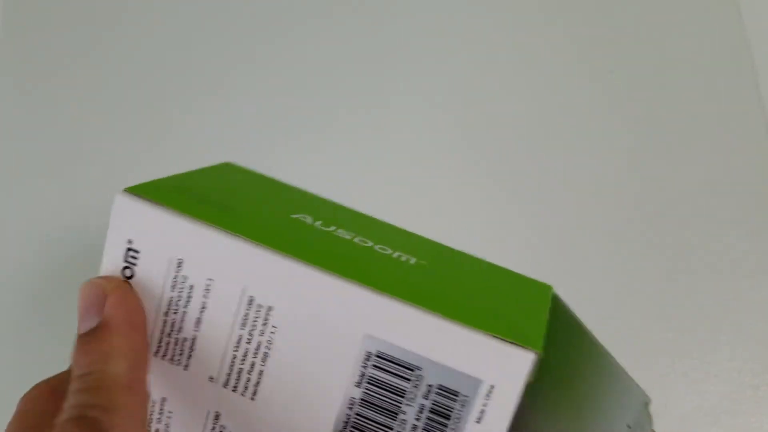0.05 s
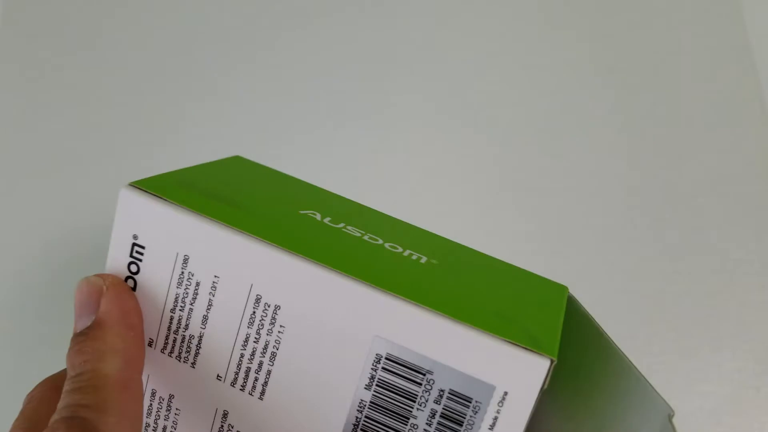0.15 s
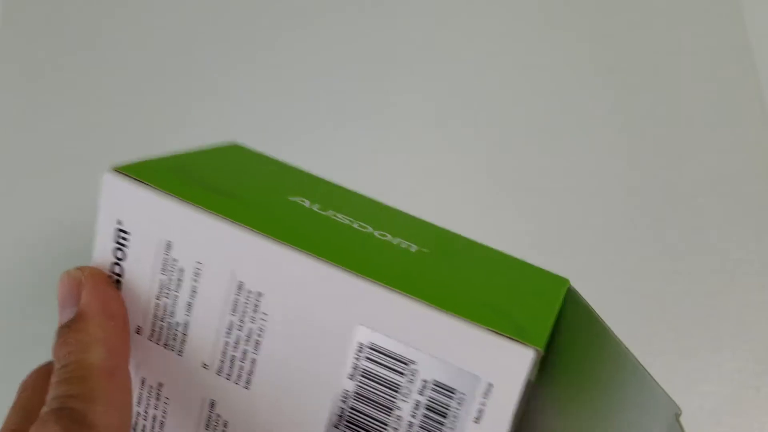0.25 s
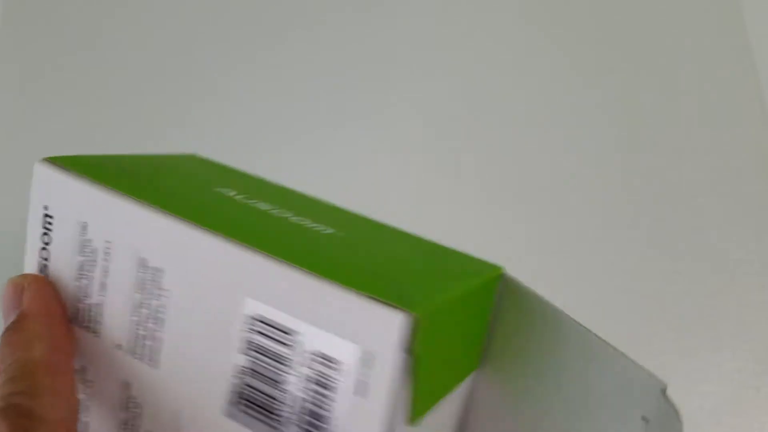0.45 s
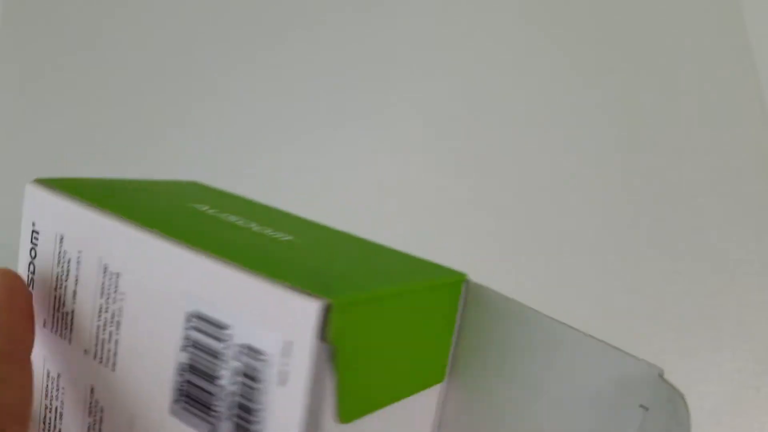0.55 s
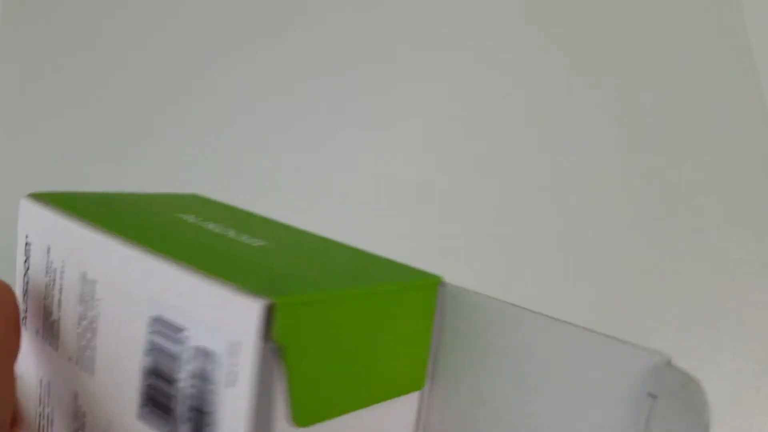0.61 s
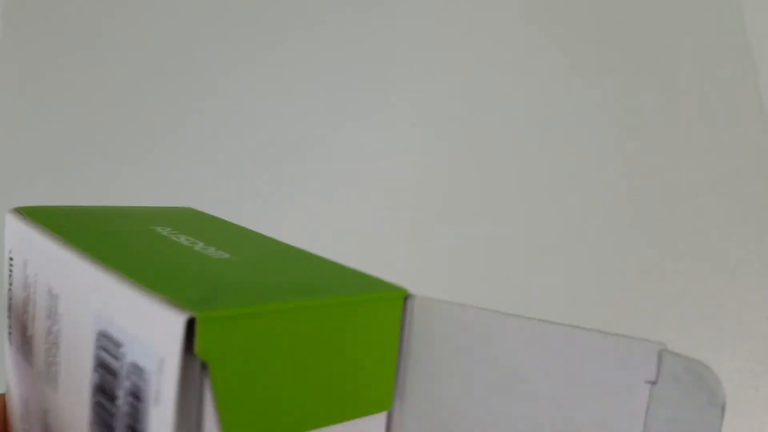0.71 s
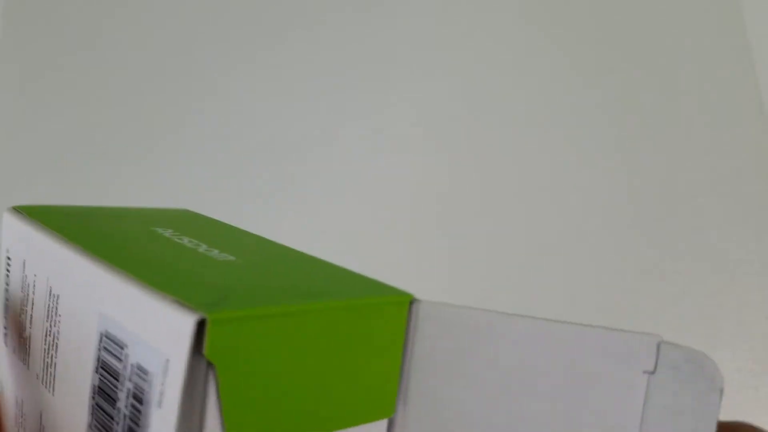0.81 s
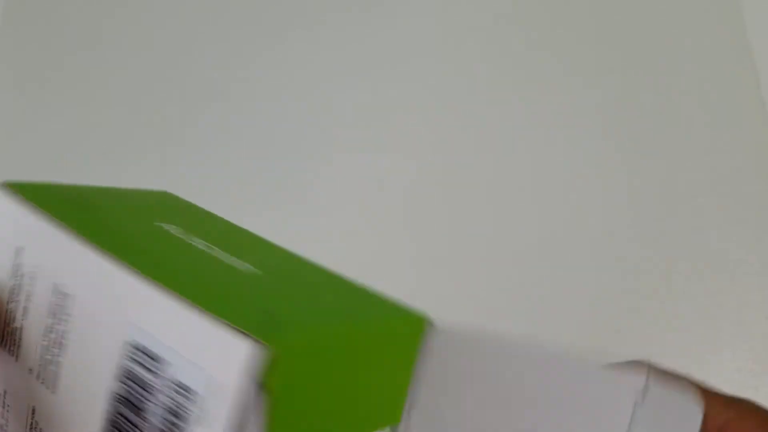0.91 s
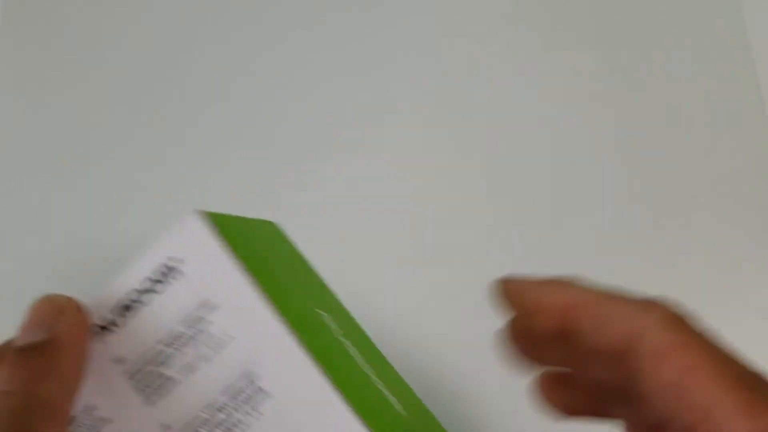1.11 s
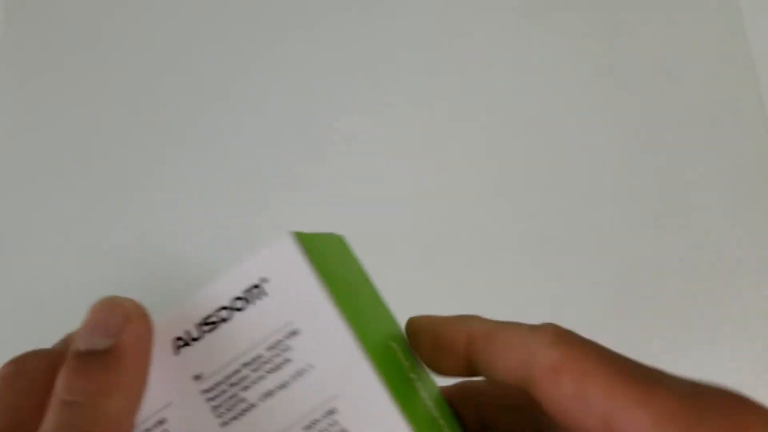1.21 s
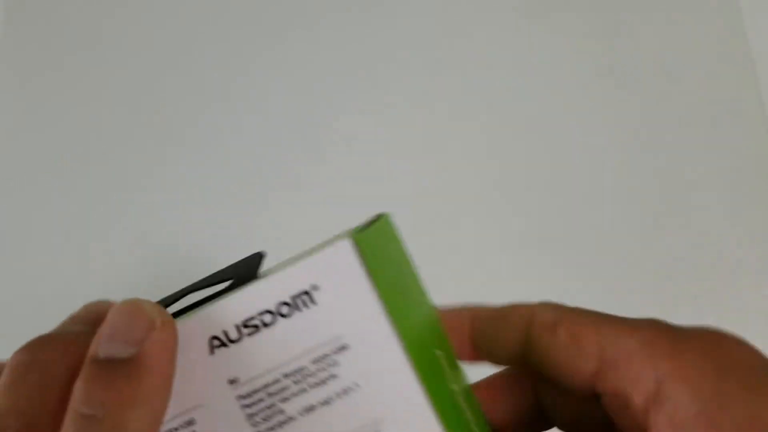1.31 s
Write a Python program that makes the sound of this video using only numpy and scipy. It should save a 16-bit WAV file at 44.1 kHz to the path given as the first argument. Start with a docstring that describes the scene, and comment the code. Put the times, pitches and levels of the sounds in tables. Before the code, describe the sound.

One loud snap of a cardboard lid coming free follows light knocks and a brief drag. Then hands turn the box, quietly rubbing and tapping it, close to the microphone and slightly right, over a faint low room hum.

```python
"""A brief scrape and a few hollow knocks: hands on a small cardboard box, close to the microphones and
a little to the right, in a bare room. The lid's tongue drags in its slot and pops free with one loud
snap that rings the lid and fills the room. As the box is turned over the flaps rub, fingers slide
over the print and tap the walls. A faint low hum throbs underneath, over quiet air."""
import sys
import numpy as np
from scipy import signal
from scipy.fft import rfft, irfft
from scipy.io import wavfile

SR = 44100
rng = np.random.default_rng(int(sys.argv[2]) if len(sys.argv) > 2 else 0)


def file_out(sig):
    """Save sig as 16-bit WAV at sys.argv[1]."""
    # one column per channel
    cols = np.atleast_2d(sig).T
    # limit, then scale
    lim = np.clip(cols, -1, 1)
    pcm = np.round(lim * 32767).astype(np.int16)
    wavfile.write(sys.argv[1], SR, pcm)


N = 59535
T = np.arange(N) / SR

# spectrum of the quiet air in the room: frequency_hz, level_db
AIR_SPECTRUM = [(20, -4), (60, -3), (110, -3), (160, -21), (1000, -30.5), (4000, -40.5), (16000, -37)]
# how long the bare room rings: frequency_hz, t60_s
ROOM_DECAY = [(100, .3), (400, .26), (1000, .265), (5000, .275), (9000, .22), (15000, .21)]
# card drags on card: start_s, end_s, level_db, tilt_db_per_octave
CARD_DRAGS = [(-0.02, 0.003, -47, -0.8), (0.145, 0.255, -52, -0.7), (0.382, 0.467, -68, 0),
              (0.488, 0.534, -61, 1.5), (0.52, 0.64, -74.5, 1.5), (0.634, 0.664, -58, 1),
              (0.68, 0.78, -63, 2), (1.264, 1.343, -65, -0.74)]
# spectrum of dragging card: frequency_hz, level_db
DRAG_SPECTRUM = [(150, -1), (350, -5.5), (600, 0), (950, -2.5), (1400, -5), (2200, -6), (3800, -10),
                 (7000, -9), (8500, -23.5), (12000, -13.5), (16000, -19.5)]
# fingertips and flaps knock on the walls: start_s, level_db, brightness_hz, pitch_ratio
WALL_TAPS = [(0.0003, -28.5, 2440, 1.63), (0.0077, -19.5, 613, 0.94), (0.0119, -35, 500, 0.47),
             (0.0281, -26.5, 2020, 0.94), (0.0435, -43, 1200, 1.48), (0.0716, -33.5, 1291, 0.88),
             (0.4364, -41, 1500, 1.15), (0.4693, -42, 1390, 1.22), (0.5335, -41.5, 794, 0.93),
             (0.6616, -44, 1190, 0.78), (1.1925, -59, 1000, 1.1), (1.3125, -35, 2940, 1.14),
             (1.3284, -35, 1404, 0.79), (1.3368, -55, 1396, 1)]
# resonances of the hollow box: pitch_hz, level_db, t60_s
HOLLOW_BOX_MODES = [(270, -12.5, 0.016), (531.5, -6, 0.016), (690, -3.5, 0.01), (823, -21.5, 0.13),
                    (1000, -2, 0.0062), (1500, -9, 0.016), (2770, -6, 0.0048), (4470, -3, .0015)]
# a nail or an edge catches: start_s, level_db
NAIL_TICKS = [(0.0072, -37), (0.0285, -38), (0.6620, -47), (1.2885, -55)]
# the tongue pops free in three quick slips: start_s, level_db
TONGUE_SLIPS = [(0.2363, -6), (0.2373, 0), (0.23835, -4)]
# resonances of the snapping lid: pitch_hz, level_db, t60_s
LID_RING_MODES = [(383.5, -20, 0.0061), (610, -13.5, 0.0059), (1086, -9, 0.0051), (1530, -20, 0.019),
                  (2080, -20, 0.022), (2540, -11.5, 0.0086), (3080, -15, 0.014), (3970, -16, 0.0029),
                  (5083, -25.5, 0.024), (6190, -20.5, 0.017), (7390, -26.5, 0.012)]
# what the whole box radiates into the room as it snaps: frequency_hz, level_db
SNAP_SPECTRUM = [(40, -7), (120, -19), (300, -9), (560, -3.5), (740, -10), (980, -1.5), (1300, -8.5),
                 (1620, -3.5), (2100, -2), (2800, -5), (3400, -10.5), (5000, -11.5), (5500, -14.5),
                 (7000, -9.5), (8100, -20), (12000, -16), (16000, -21)]
# hollow tones that linger in box and room after the snap: pitch_hz, level_db, t60_s
LINGERING_MODES = [(363, -40, .2), (563, -32, .18), (872, -33, .23), (1063, -39, .34), (1652, -36.5, .37),
                   (2060, -32, .22)]
# skin slides over the printed face: start_s, end_s, level_db, low_edge_hz, pan_db
FINGER_SLIDES = [(0.844, 0.951, -45, 296, -9), (1.161, 1.240, -58.5, 5780, -11.5)]
# spectrum of skin on print: frequency_hz, level_db
SLIDE_SPECTRUM = [(200, -42), (450, -24), (640, -9.5), (1130, -16), (1450, -4), (1780, -13), (2200, -3.5),
                  (3300, -2.5), (5300, -5.5), (6800, 1.5), (8500, -12.5), (12500, -2), (16000, -3.5)]
# panel resonances that shift as the finger moves: first_hz, last_hz, width_hz, level_db
PANEL_GLIDES = [(600, 720, 60, 9), (760, 950, 80, 5), (1250, 1400, 80, 17.5), (1620, 1520, 70, 11),
                (1850, 1860, 15, 23)]
# a fingertip lands softly and rubs to a stop: start_s, level_db, decay_s
FINGER_SCUFFS = [(1.160, -69, .016), (1.186, -65, .022)]

ROOM_PAN_DB = -1.5   # every pan is left level minus right level


def from_db(db):
    """Decibels to gain."""
    return 10 ** (np.asarray(db) / 20)


def unit_rms(x):
    """Scale to unit power."""
    return x / np.sqrt(np.mean(x ** 2) + 1e-20)


def at_hz(points, hz):
    """Read a table on a log-frequency axis."""
    table_hz, values = np.transpose(points)
    return np.interp(np.log(np.maximum(hz, 1)), np.log(table_hz), values)


def coloured(x, spectrum, tilt_db=0):
    """Give a steady sound a spectrum, tilted per octave; unit power."""
    hz = np.arange(N // 2 + 1) * SR / N + 1
    gain = from_db(at_hz(spectrum, hz) + tilt_db * np.log2(hz))
    return unit_rms(irfft(rfft(x) * gain, N))


def cut(x, hz, kind, order=2):
    """Butterworth filter."""
    return signal.sosfilt(signal.butter(order, hz, kind, fs=SR, output="sos"), x + 1e-18)


def click(start_s):
    """A unit impulse."""
    return 1. * (np.arange(N) == int(start_s * SR))


def burst(start_s, decay_s):
    """Noise that starts abruptly and dies away."""
    return rng.standard_normal(N) * (T >= start_s) * np.exp(-np.abs(T - start_s) / decay_s)


def stroke(start_s, end_s, attack_s, release_s):
    """The level of a rub: it swells, holds and dies away."""
    swell = np.sin(np.pi / 2 * np.clip((T - start_s) / attack_s, 0, 1)) ** 2
    return swell * np.exp(-np.maximum(T - end_s, 0) / release_s)


def friction(catches_per_s=27000, spread_db=1, flutter_db=1.5):
    """Dense tiny catches of uneven size, under a fluttering pressure."""
    sizes = from_db(spread_db * np.minimum(rng.exponential(1, N), 5)) * rng.choice([-1, 1], N)
    flutter = unit_rms(cut(rng.standard_normal(N), 45, "low"))
    catches = rng.random(N) < catches_per_s / SR
    return sizes * catches * from_db(flutter_db * flutter)


def ring(force, modes):
    """Damped modes driven by a force, neighbours in opposite sense."""
    out = 0
    for k, (hz, db, t60_s) in enumerate(modes):
        radius, angle = from_db(-60 / (t60_s * SR)), 2 * np.pi * hz / SR
        poles = [1, -2 * radius * np.cos(angle), radius ** 2]
        out += (-1) ** k * from_db(db) * signal.lfilter([.5, 0, -.5], poles, force + 1e-18)
    return out


def gliding(x, hz, width_hz):
    """A resonance whose centre moves; gain 1 at its peak."""
    radius = np.exp(-np.pi * width_hz / SR)
    out, state = np.zeros(N), np.zeros(2)
    for i in range(0, N, 128):
        block = slice(i, i + 128)
        poles = [1, -2 * radius * np.cos(2 * np.pi * hz[i] / SR), radius ** 2]
        out[block], state = signal.lfilter([1, 0, -1], poles, x[block], zi=state)
    return out * (1 - radius ** 2) / 2


def panned(pan_db):
    """Left and right gains for a level difference."""
    return from_db(np.array([[pan_db], [-pan_db]]) / 2)


def direct(x, pan_db, left_lag_s=.00023):
    """Direct sound reaches the right microphone first and louder."""
    left = np.pad(x, (int(left_lag_s * SR), 0))[:N]
    return np.array([left, x]) * panned(pan_db)


def room_response(spectrum=None, gap_s=.00064, build_s=.00055):
    """Dense reflections, different at each microphone, each band dying at its own rate; unit energy."""
    noise = rng.standard_normal((2, 2, N))
    if spectrum is not None:
        noise = coloured(noise, spectrum)
    age_s = np.maximum(T - gap_s, 0)
    edges_hz = np.geomspace(30, 18000, 19)
    reflections = 0
    for k, (low, high) in enumerate(zip(edges_hz, edges_hz[1:])):
        fall_db = -60 * age_s / at_hz(ROOM_DECAY, np.sqrt(low * high))
        reflections += cut(noise[k % 2], (low, high), "band") * from_db(fall_db)
    mid, side = reflections
    side = cut(side, 350, "high", order=1)   # long waves reach both microphones alike
    build_up = 1 - np.exp(-age_s / build_s)
    return unit_rms(np.array([mid + side, mid - side]) * build_up) / np.sqrt(N)


def place(x, room, pan_db, room_db):
    """A close source: the direct sound plus the room's answer."""
    reverb = signal.fftconvolve(x[None], room, axes=1)[:, :N]
    return direct(x, pan_db) + from_db(room_db) * panned(ROOM_PAN_DB) * reverb


def room_tone(hum_hz=61.5, left_lag_s=.0018, throb_s=.16, first_swell_s=.134, depth=.82):
    """A low hum throbs over quiet air that is partly alike at both microphones."""
    throb = 1 - depth * np.abs(np.sin(np.pi * (T - first_swell_s) / throb_s))
    cycles = hum_hz * np.array([T - left_lag_s, T]) + rng.random()
    hum = np.sqrt(2) * np.sin(2 * np.pi * cycles) * throb
    air = rng.standard_normal(N) + from_db(-1) * rng.standard_normal((2, N))
    return from_db(-57.3) * panned(-2) * hum + from_db(-70) * coloured(air, AIR_SPECTRUM)


def card_drags(room):
    """The tongue and flaps scrape along the walls."""
    grains, rubs = friction(), 0
    for start_s, end_s, db, tilt_db in CARD_DRAGS:
        scrape = coloured(np.roll(grains, rng.integers(N)), DRAG_SPECTRUM, tilt_db)
        rubs += from_db(db) * stroke(start_s, end_s, attack_s=.041, release_s=.04) * scrape
    return place(rubs, room, pan_db=-13.5, room_db=-.5)


def wall_taps():
    """Knocks ring the hollow box, higher or lower with the spot they hit."""
    knocks = 0
    for start_s, db, brightness_hz, pitch_ratio in WALL_TAPS:
        force = cut(click(start_s), brightness_hz, "low", order=1)
        knocks += from_db(db) * ring(force, np.array(HOLLOW_BOX_MODES) * [pitch_ratio, 1, 1])
    return knocks


def nail_ticks():
    """Hard little contacts give only a thin tick."""
    ticks = sum(from_db(db) * burst(start_s, decay_s=.0016) for start_s, db in NAIL_TICKS)
    return cut(ticks, 2500, "high")


def lid_snap():
    """Each slip of the tongue cracks and strikes the lid; the bang fills the room and tones linger."""
    force = sum(from_db(db) * click(start_s) for start_s, db in TONGUE_SLIPS)
    # fibres tear past the edge at each slip
    tearing = sum(from_db(db) * burst(start_s, decay_s=.00017) for start_s, db in TONGUE_SLIPS)
    lid = ring(force, LID_RING_MODES) + from_db(-12) * cut(tearing, 3530, "high")
    loudest_s, last_s = TONGUE_SLIPS[1][0], TONGUE_SLIPS[-1][0]
    tail = np.pad(room_response(SNAP_SPECTRUM), ((0, 0), (int(loudest_s * SR), 0)))[:, :N]
    tail[0] = cut(tail[0], 8950, "low", order=1)   # the treble is shaded on the left
    hollow = ring(click(last_s), LINGERING_MODES)
    return direct(lid, pan_db=-11) + panned(ROOM_PAN_DB) * (from_db(10) * tail + hollow)


def finger_slides(room, panel_fade_s=.07):
    """Fingers hiss across the smooth face and stir panel resonances that shift along the stroke."""
    out = 0
    for start_s, end_s, db, low_edge_hz, pan_db in FINGER_SLIDES:
        skin = unit_rms(cut(coloured(friction(), SLIDE_SPECTRUM), low_edge_hz, "high", order=3))
        hiss = from_db(db) * stroke(start_s, end_s, attack_s=.052, release_s=.019) * skin
        # the finger moves off the middle of the panel
        drive = hiss * np.exp(-np.maximum(T - start_s, 0) / panel_fade_s)
        panel = 0
        for first_hz, last_hz, width_hz, mode_db in PANEL_GLIDES:
            centre_hz = np.interp(T, [start_s, end_s], [first_hz, last_hz])
            panel += from_db(mode_db) * gliding(drive, centre_hz, width_hz)
        out += place(hiss + panel, room, pan_db, room_db=-9.5)
    return out


def finger_scuffs(attack_s=.01):
    """A fingertip lands softly; its dull friction rings the box as it stops."""
    rubbed_box = unit_rms(ring(cut(friction(), 1000, "low", order=1), HOLLOW_BOX_MODES))
    return rubbed_box * sum(from_db(db) * stroke(start_s, start_s + attack_s, attack_s, decay_s)
                            for start_s, db, decay_s in FINGER_SCUFFS)


def scene():
    """The box is handled close by, right of centre, in one bare room."""
    room = room_response()
    snap = lid_snap()
    touches = place(wall_taps() + finger_scuffs() + nail_ticks(), room, pan_db=-3, room_db=-5)
    return snap + touches + card_drags(room) + finger_slides(room) + room_tone()


def record(dry, cutoff_hz=15800):
    """The recorder clips at full scale and cuts the top treble."""
    lowpass = signal.ellip(10, .1, 80, cutoff_hz, fs=SR, output="sos")
    return signal.sosfilt(lowpass, np.clip(dry, -1, 1))


dry = scene()
out = record(dry)
file_out(out)
```